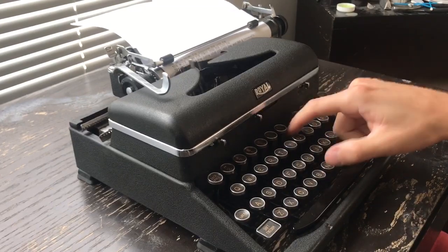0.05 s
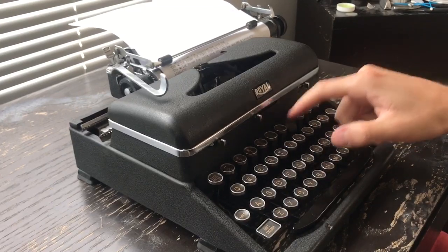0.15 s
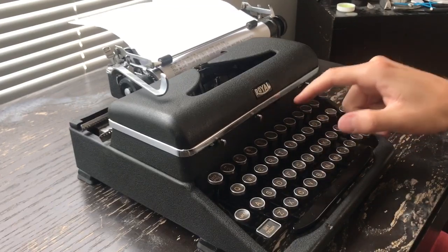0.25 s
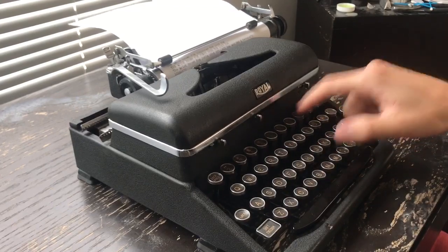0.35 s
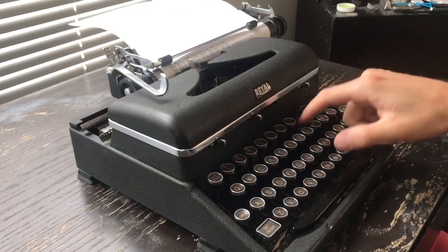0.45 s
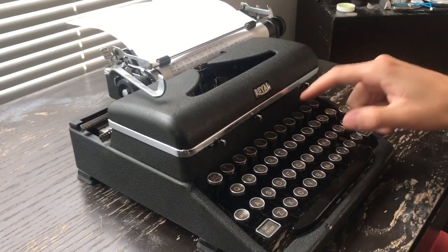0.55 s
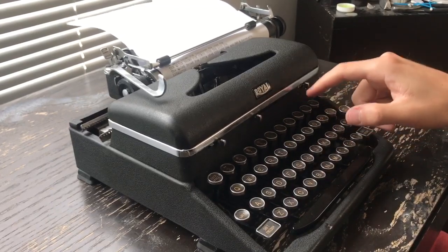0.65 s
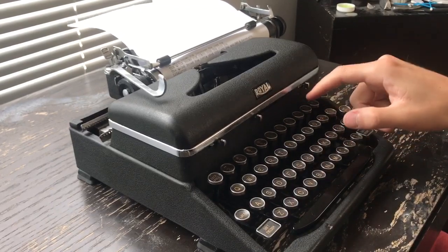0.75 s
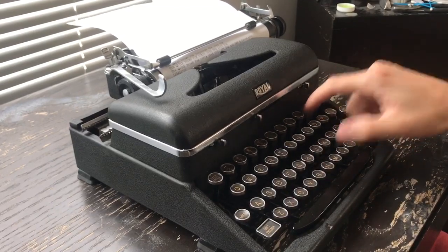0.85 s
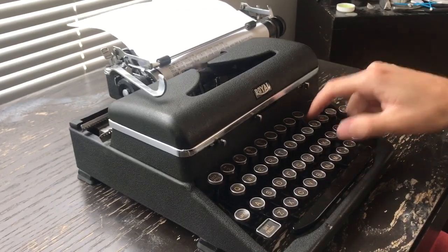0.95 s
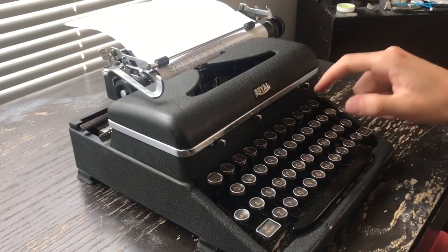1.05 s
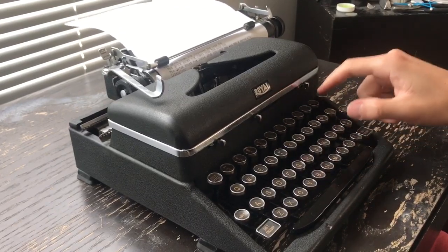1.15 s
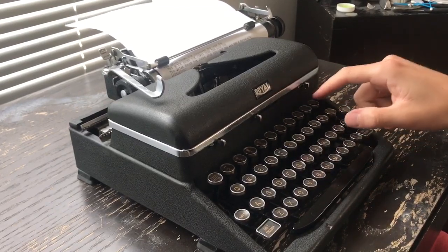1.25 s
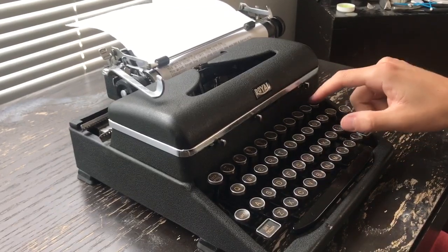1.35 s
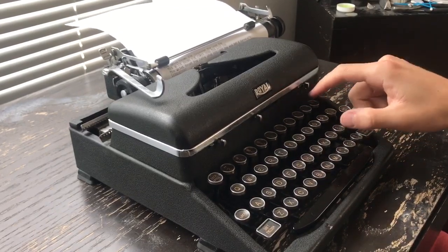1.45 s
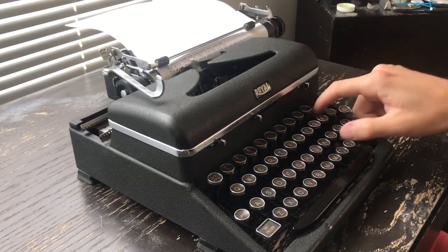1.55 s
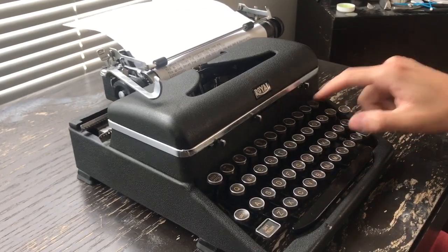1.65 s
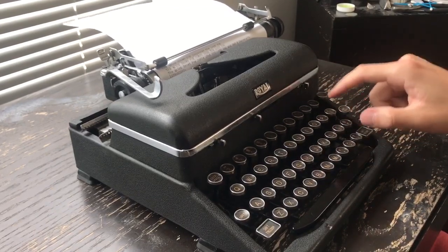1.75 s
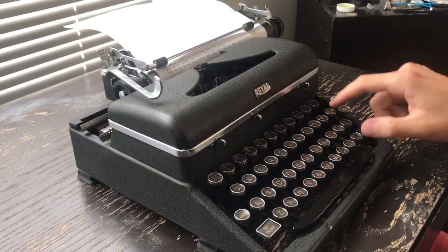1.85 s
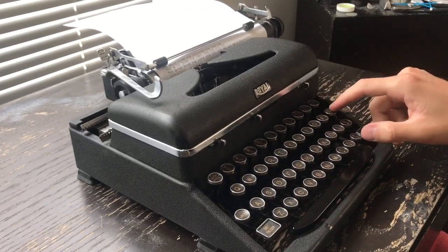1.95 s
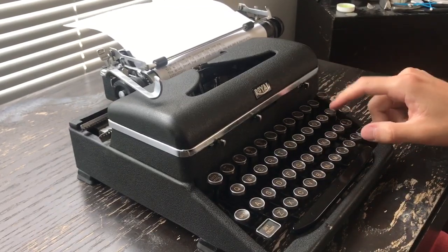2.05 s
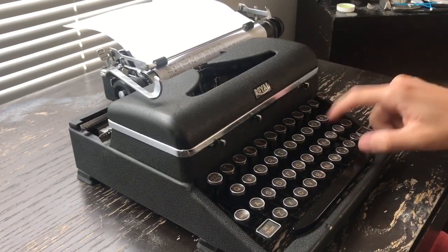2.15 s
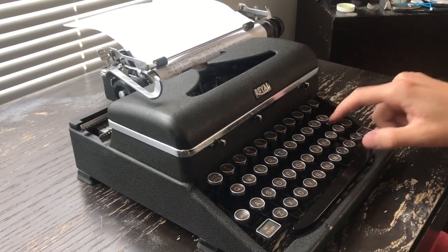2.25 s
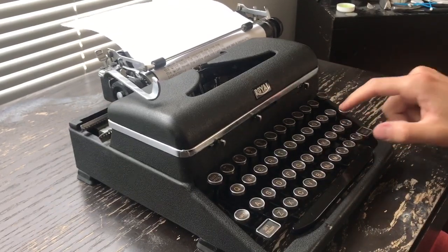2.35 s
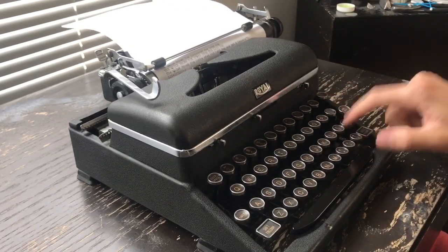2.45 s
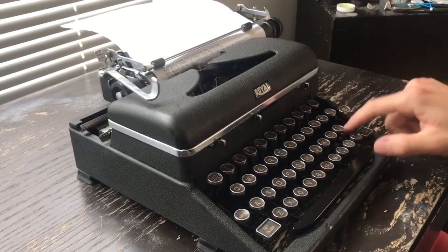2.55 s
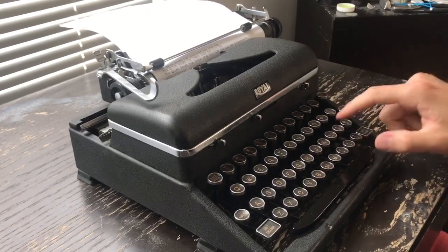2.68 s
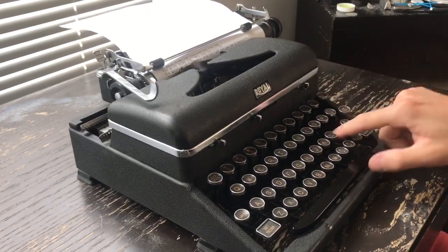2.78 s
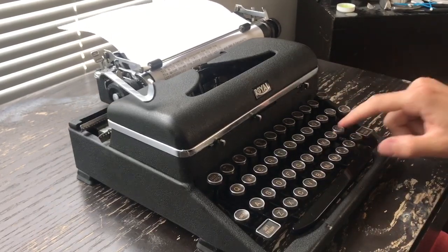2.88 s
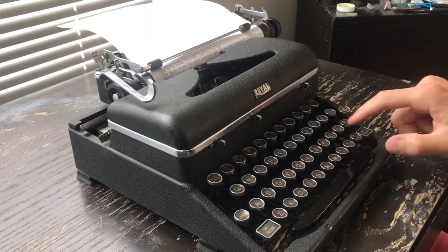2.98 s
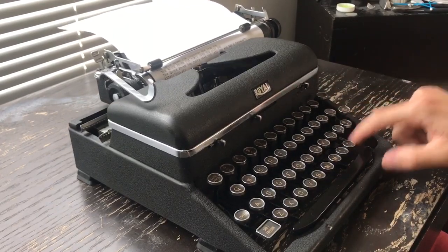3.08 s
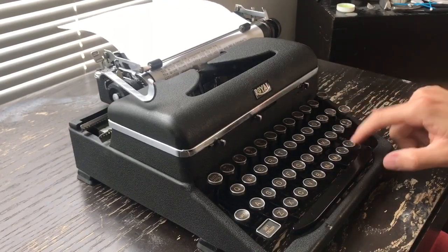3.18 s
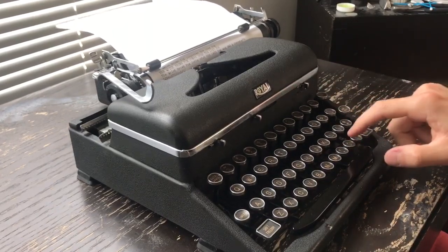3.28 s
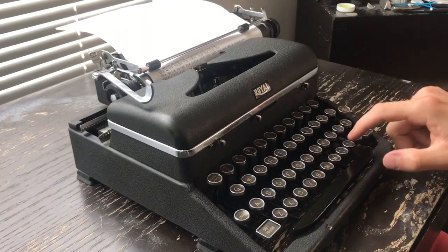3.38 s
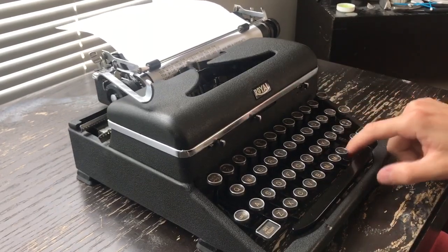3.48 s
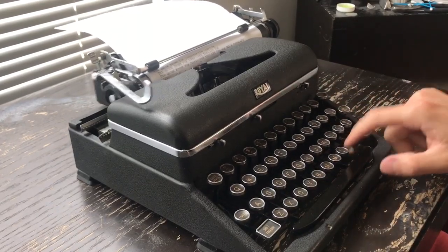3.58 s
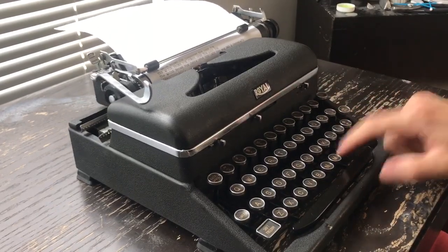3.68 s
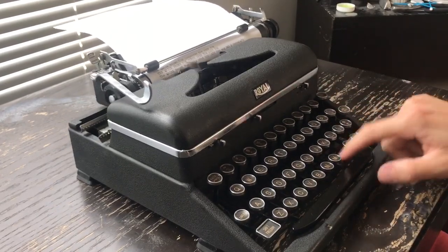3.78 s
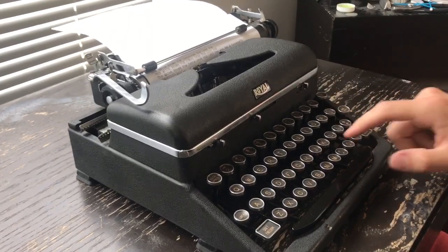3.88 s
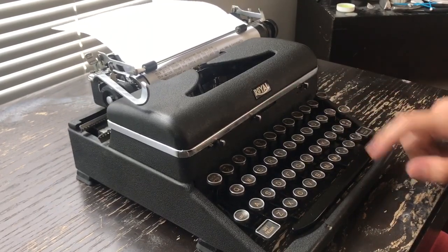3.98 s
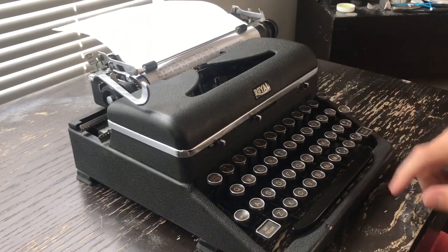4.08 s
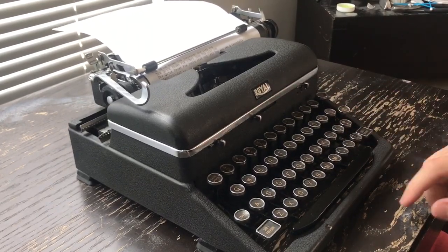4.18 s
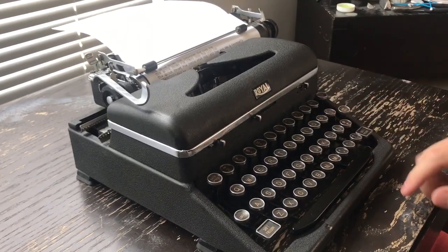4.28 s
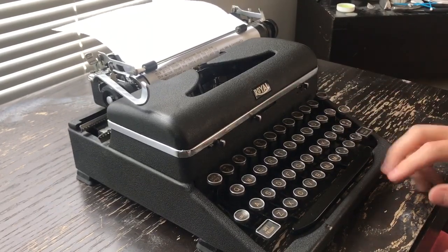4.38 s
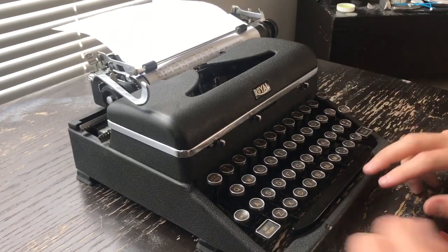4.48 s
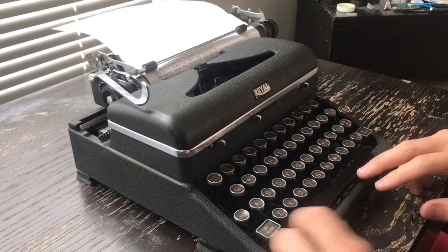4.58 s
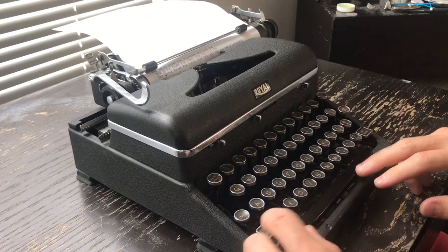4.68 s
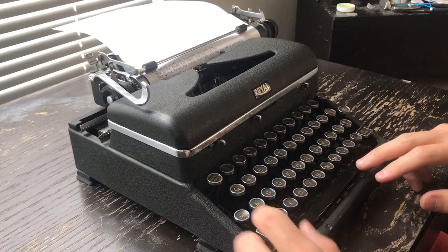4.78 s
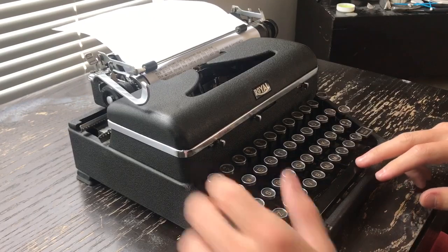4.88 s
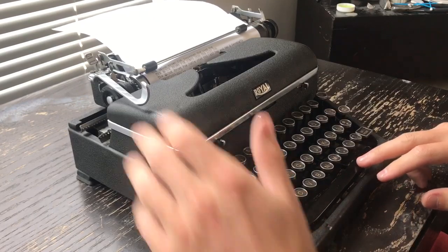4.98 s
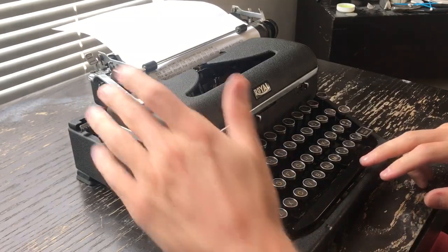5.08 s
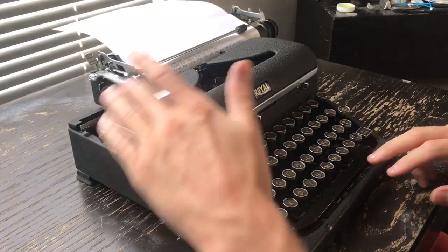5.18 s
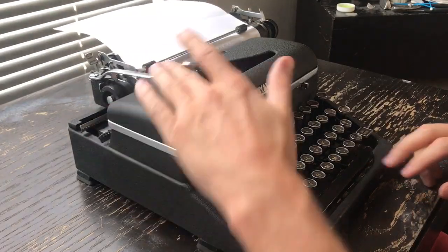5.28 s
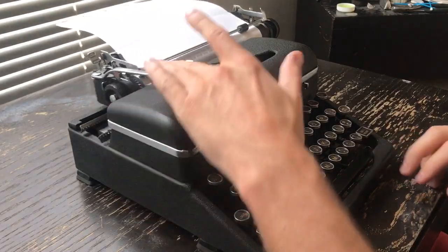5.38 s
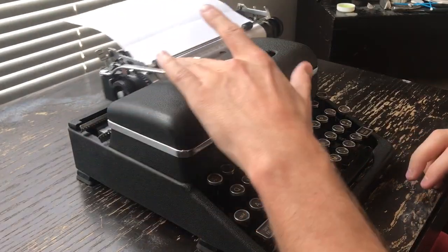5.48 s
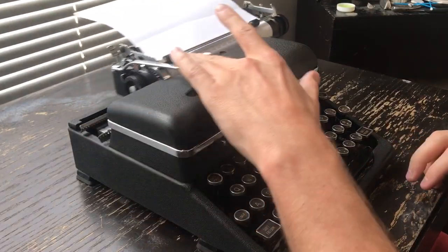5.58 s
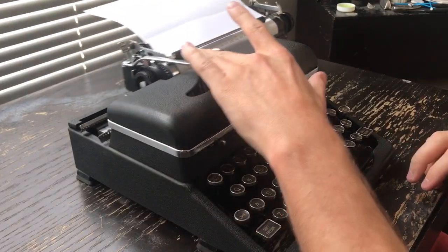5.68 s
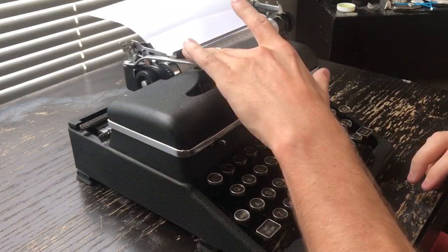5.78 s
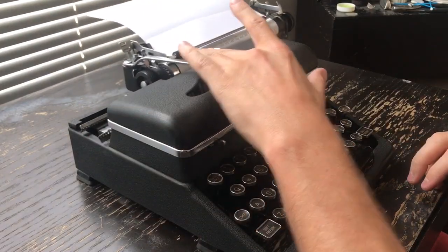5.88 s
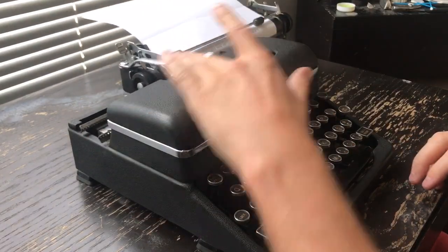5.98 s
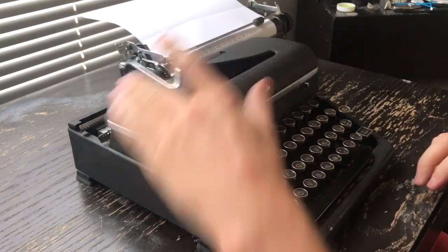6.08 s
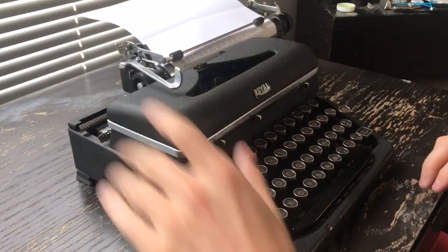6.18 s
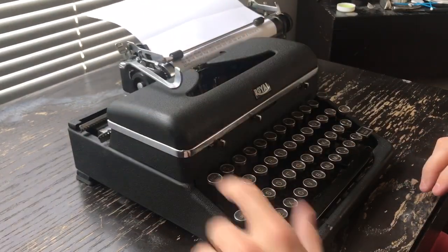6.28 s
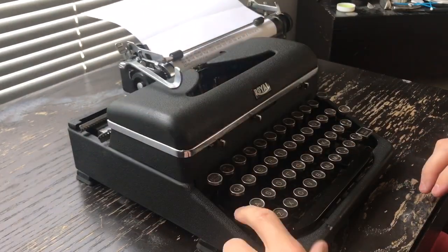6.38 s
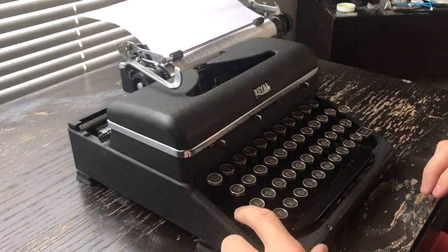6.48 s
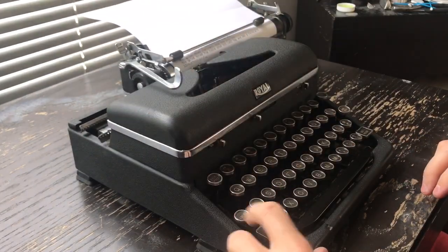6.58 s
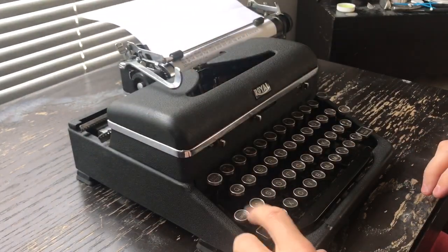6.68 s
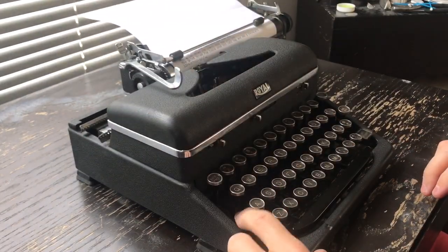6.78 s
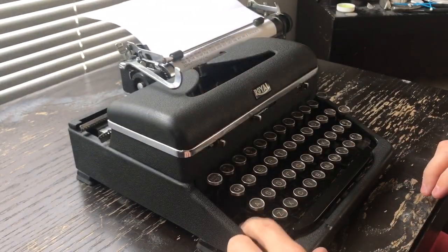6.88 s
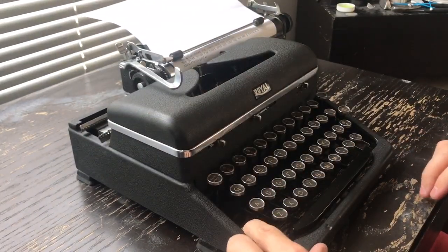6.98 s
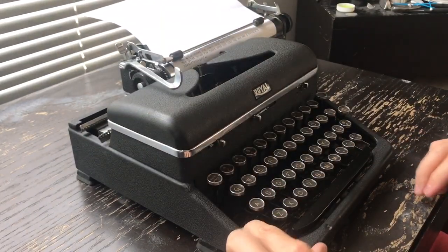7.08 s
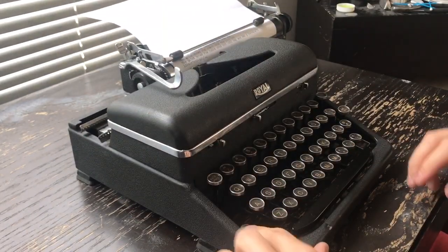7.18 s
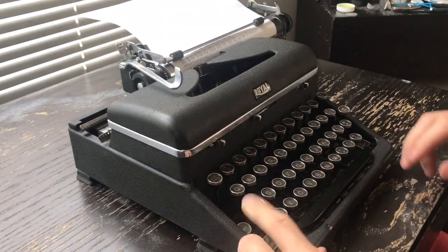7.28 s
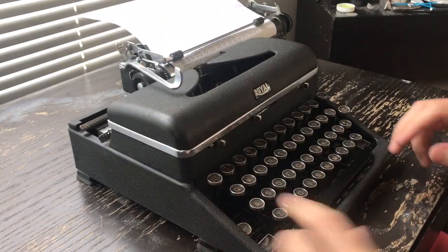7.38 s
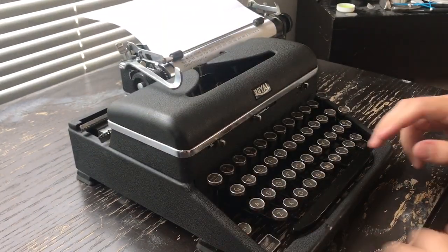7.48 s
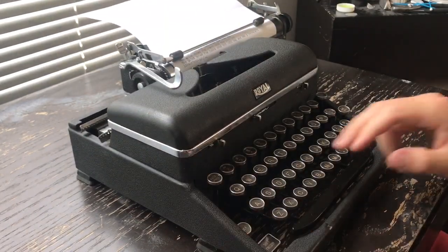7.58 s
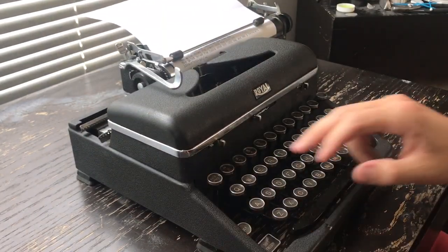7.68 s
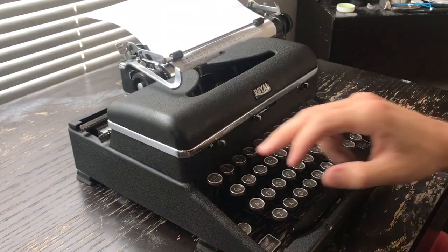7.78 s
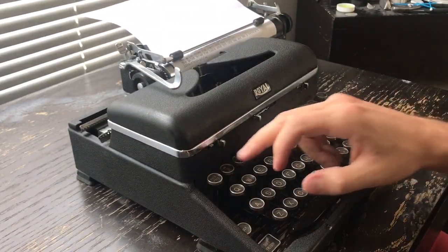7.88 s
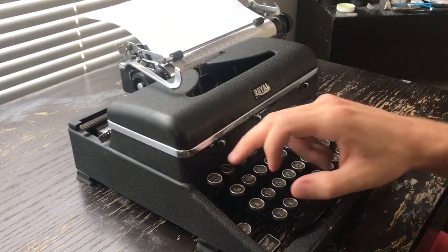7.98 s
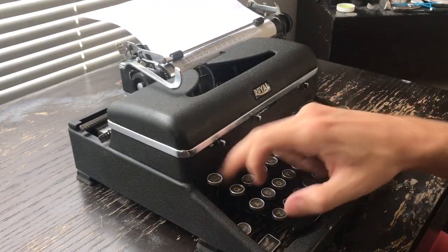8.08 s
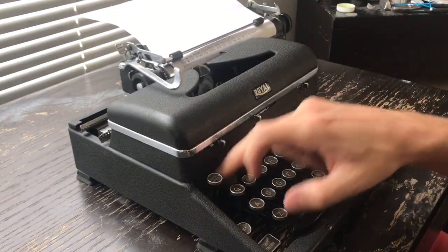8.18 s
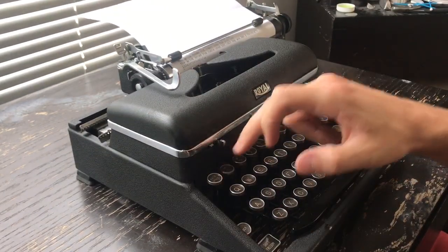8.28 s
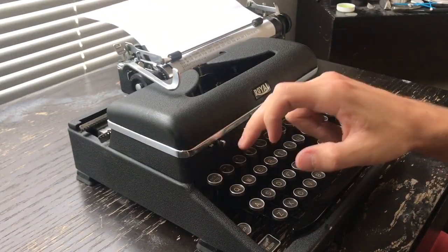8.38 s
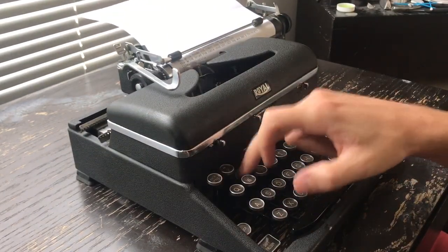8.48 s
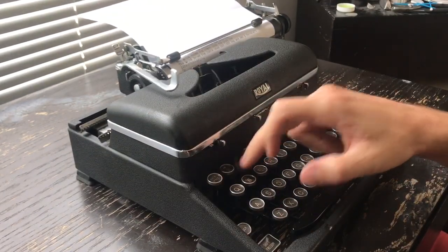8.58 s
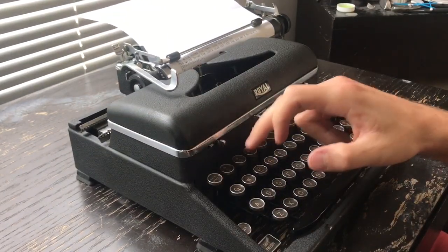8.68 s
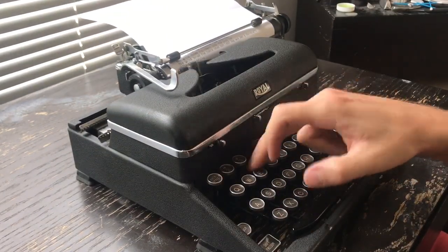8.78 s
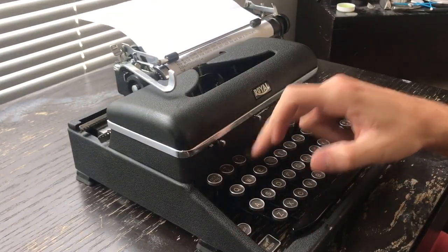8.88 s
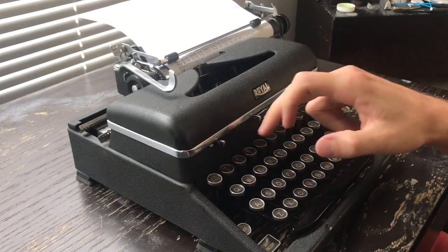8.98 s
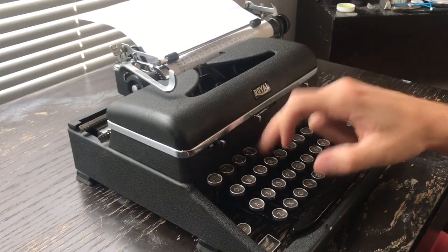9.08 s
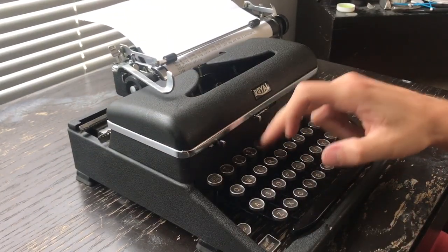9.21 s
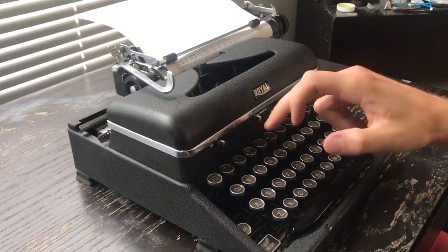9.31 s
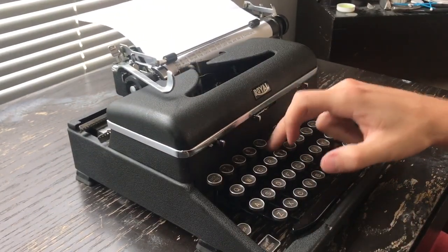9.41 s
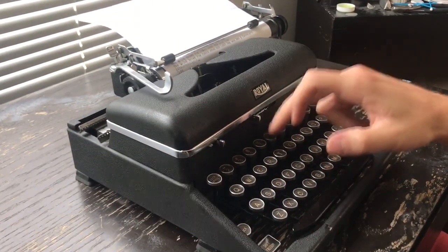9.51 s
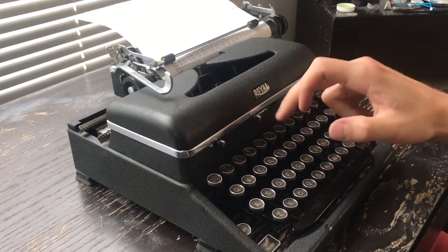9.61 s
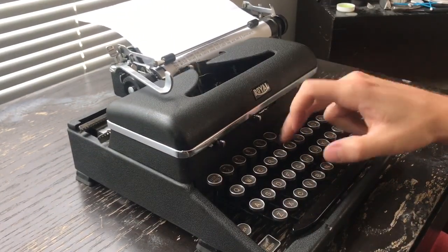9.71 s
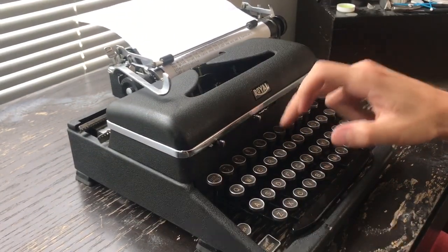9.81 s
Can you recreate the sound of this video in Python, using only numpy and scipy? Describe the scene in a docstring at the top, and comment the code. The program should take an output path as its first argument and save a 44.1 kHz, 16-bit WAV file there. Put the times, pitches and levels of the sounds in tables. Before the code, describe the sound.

Slow, sharp clacks of a manual typewriter, broken by a short rasping carriage return and a few knocks before the typing resumes.

```python
"""A portable manual typewriter, typed with one finger on a wooden desk in a small room.
Each letter is a chain of impacts: the key linkage clicks, the escapement trips, the typebar slaps the
platen, the carriage steps and the bar drops back. The blows excite modes of the steel frame and the desk.
Between two words the carriage is pushed back over its ratchet and the shift is locked.
Reverberation follows each blow, over a low rumble and a faint hiss that comes and goes."""
import sys
import numpy as np
from scipy import signal
from scipy.fft import rfft, irfft, next_fast_len
from scipy.io import wavfile

SR = 44100
rng = np.random.default_rng(int(sys.argv[2]) if len(sys.argv) > 2 else 0)


def persist_wave(psi):
    """Save psi, clipped to +-1, as 16-bit WAV."""
    counts = np.round(np.clip(psi, -1, 1) * 32767).astype(np.int16)
    wavfile.write(sys.argv[1], SR, np.atleast_2d(counts).T)


N = 434385

# Levels in the tables are relative; each source adds its own gain.
# noise spectra of the background and the contacts: frequency_hz, density_db
RUMBLE_SPECTRUM = [(15, -54), (25, -21.5), (39, -6.5), (59, -3.5), (161, -9), (180, -24.5), (200, -10.5),
                   (293, -18.5), (326, -16), (607, -29), (754, -24), (887, -30.5), (1330, -28), (1740, -36),
                   (16000, -50)]  # still room
SLAP_SPECTRUM = [(100, -15.5), (400, -10), (900, -6.5), (1600, -12), (2200, -7), (2800, 1.5), (3400, -5),
                 (4400, -0.5), (5300, -5.5), (7300, -8), (9500, -8.5), (12000, -8.5), (15500, -12.5)]  # typebar and escapement
FELT_SPECTRUM = [(100, 1), (300, -1), (480, -6.5), (720, -1), (1050, 0), (1900, -6.5), (3000, -6),
                 (5000, -16.5), (9000, -19.5), (16000, -29)]  # cushioned blows
LINKAGE_SPECTRUM = [(200, -8), (900, 0.5), (2000, -1), (3000, -2), (5000, -8.5), (8000, -6.5), (12000, -6),
                    (16000, -4.5)]  # key linkage
SPRING_SPECTRUM = [(300, -15), (1500, -5), (3000, -2.5), (6000, -2), (9000, -7), (12500, -1), (16000, -5)]  # small springs
PAWL_SPECTRUM = [(400, -31), (700, -1), (930, -12), (1250, -3), (1440, -17), (1750, -3), (2300, -3.5),
                 (3000, -3), (4000, -2), (5100, -6), (7200, -5), (8400, -3.5), (10200, -5.5), (15500, -5.5)]  # pawl on a tooth
LATCH_SPECTRUM = [(250, -9), (700, -1), (1130, 4), (1800, -3), (2700, 1), (3600, -5), (4400, -2.5),
                  (6500, -10.5), (8200, 0.5), (10500, -18), (14000, -9), (16000, -21)]  # shift latch
CRACK_SPECTRUM = [(1200, -28.5), (2000, -2), (3200, 1), (5500, -22.5)]  # the bar itself
HISS_SPECTRUM = [(1000, 1), (4000, -2.5), (16000, -8.5)]
# reverberation of machine and room: frequency_hz, level_db, t60_s
REVERB_BANDS = [(80, -7.5, 0.98), (250, -10, 0.55), (498, -8.5, 0.54), (1200, -7.5, 0.35), (3020, -9, 0.36),
                (6200, -8, 0.38), (10800, -6, 0.2), (16000, -9, 0.24)]
# normal modes: pitch_hz, level_db, t60_s
DESK_MODES = [(59.3, -13, 1), (86.6, -6, .25), (117.2, -6, 0.35), (156.4, -1.5, 0.19), (207.2, -0.5, 0.41),
              (269.3, -8, .35), (290.5, -6.5, 0.33), (361, -8, 0.13), (545, -7, 0.2)]  # case and desk top
ROCKING_MODES = [(61.2, -5, 0.98), (73, -22, .3), (95.3, -11, 0.74), (114.7, -2, 0.25), (163.4, -3, 0.26),
                 (196, -2.5, 0.23), (263, -20, 0.24)]  # machine on its rubber feet
RACK_MODES = [(921, -7, .04), (1440, -9, .04), (2360, -1, .025), (2960, 1, .025), (3970, 2, .02),
              (5080, -1, .02), (8380, -1, .025)]  # toothed rack and carriage
FRAME_MODES = [(1980, -2, .07), (2330, -5, .05), (2576, 0.5, .09), (2590, 0.5, .08), (2647, -5, .06),
               (2850, -6.5, 0.061), (2935, -0.5, 0.22), (3152, -4.5, 0.046), (3436, -7.5, .09),
               (3660, -6.5, 0.14), (4358, -7.5, .05), (4700, -10.5, .05), (5300, -9, .06)]  # steel frame and typebar basket
LEFT_BAR_MODES = [(4295, 9, 0.021), (4450, 10.5, 0.013), (4960, -12, .028), (5510, 8, 0.022),
                  (9700, -19, 0.028), (11300, 0, 0.033)]  # higher-ringing bars at the left of the basket
# spells of hiss: start_s, end_s, level_db
HISS_SPELLS = [(0, 1.406, -65.5), (2.259, 4.24, -66)]
# hand on the return lever, carriage on its stop, parts settling:
# start_s, level_db, treble_db, rocking_db, t60_s
CARRIAGE_KNOCKS = [(4.392, -62, -15, -1, 0.081), (5.303, -56, 9.5, -1, 0.04), (5.334, -57, 0, 8, 0.16),
                   (5.362, -57.5, 6, 7.5, 0.36), (5.392, -40, 7, -21, 0.052), (5.81, -37, -16, -8.5, 0.075),
                   (6.041, -35.5, -10, -1, 0.094), (6.16, -45, -3, -9.5, 0.059),
                   (7.084, -53, -2.5, 1.5, 0.062), (7.341, -42, -11, -17, 0.069)]
# carriage being pushed back: time_s, speed_teeth_per_s
CARRIAGE_SPEED = [(5.491, 34.7), (5.55, 42.9), (5.61, 62.8), (5.67, 71.3), (5.81, 48.7)]
# return lever and other small springs snapping home: start_s, level_db
SPRING_TICKS = [(5.325, -49), (6.0129, -45.5), (6.032, -42), (6.0994, -35), (7.3386, -39.5)]
# shift lifting, then latching: start_s, level_db, thump_db
SHIFT_CLACKS = [(6.8975, -36.5, -6.5), (6.997, -27, -5)]
# one row a letter; the swing precedes the hit, fall (bar at rest) and hold (key up) count from it:
# hit_s, level_db, ring_db, treble_db, click_db, swing_s, fall_s, hold_s
KEYSTROKES = [(0.1379, -24.5, -0.5, 0, -37.5, 0.037, 0.11, 0.12),
              (0.4974, -24, -3, 0.5, -36.5, 0.037, 0.11, 0.13),
              (0.9848, -21.5, -5, -5.5, -37.5, 0.033, 0.11, .122),
              (1.6281, -28, 2.5, 2.5, -37, .040, 0.079, 0.12),
              (2.2664, -23.5, -0.5, 2, -40, 0.036, 0.12, 0.17),
              (2.5959, -24.5, 0.5, -3, -38.5, 0.037, 0.075, 0.12),
              (2.861, -28, 5, 2, -36.5, 0.036, 0.06, .127), (3.2044, -23, -0.5, 1.5, -41, .033, 0.11, .150),
              (3.581, -27.5, 3, 2, -43.5, 0.033, 0.11, 0.14),
              (3.8173, -24, 1.5, 6, -38.5, .027, 0.11, 0.14),
              (8.2072, -37.5, -19.5, 9.5, -38, .0495, .097, .127),
              (8.59, -31, -19, 7, -35, .0408, 0.096, 0.11),
              (8.8814, -26.5, -8, 6.5, -40.5, 0.037, 0.099, 0.12),
              (9.2094, -23.5, -18, 2.5, -33.5, .0362, .099, .117),
              (9.5072, -28, -1, -1, -34, .0405, .094, .1078),
              (9.803, -25.5, -7, 2.5, -39.5, 0.041, .1, 0.15)]

AGE = np.arange(10240) / SR  # time since a blow, s


def undb(db):
    """Amplitude ratio of a level in decibels."""
    return np.exp(np.asarray(db) * (np.log(10) / 20))


def envelope(age, rise_s, t60_s):
    """Damped response: a quick build-up times an exponential decay of 60 dB in t60_s."""
    return (1 - np.exp(-age / rise_s)) * np.exp(-np.log(1000) * age / t60_s)


def add(track, start_s, db, sound):
    """Superposition: a sound adds to the track at a given time and gain."""
    i = int(np.clip(start_s * SR, 0, N))
    track[i:i + len(sound)] += undb(db) * sound[:N - i]


def noise(spectrum, size, treble_db=0, hinge_hz=6000):
    """Spectral shaping: white noise is coloured at unit rms, then its treble is shelved."""
    count = next_fast_len(size, real=True)
    hz = np.maximum(np.fft.rfftfreq(count, 1 / SR), 1)
    points_hz, db = np.transpose(spectrum)
    gain = undb(np.interp(np.log(hz), np.log(points_hz), db))
    gain /= np.sqrt(np.mean(gain ** 2))
    shelf = undb(treble_db / (1 + (hinge_hz / hz) ** 4))
    return irfft(rfft(rng.standard_normal(count)) * shelf * gain, count)[:size]


def contact(spectrum, t60_s, rise_s=.00048, treble_db=0, chatter_db=0, size=4096):
    """Modal overlap: the short resonances of many small parts merge into a burst of noise."""
    age = AGE[:size]
    # loose parts chatter about every 2 ms
    chatter = np.interp(age, np.linspace(0, age[-1], 48), rng.standard_normal(48))
    shape = envelope(age, rise_s, t60_s)
    resonances = noise(spectrum, size, treble_db)
    sound = resonances * shape * undb(chatter_db * chatter)
    # the blow sets the energy, however it is shared out
    return sound * np.std(resonances) * np.sqrt(np.sum(shape ** 2) / np.sum(sound ** 2))


def ring(modes, rise_s, scatter_db, detune):
    """Free vibration is a sum of damped modes; each blow lands elsewhere and weights them anew."""
    hz, db, t60_s = np.transpose(modes)[:, :, None]
    age = AGE[:int(t60_s.max() * SR)]
    pitch_draw, level_draw, start_cycles = rng.standard_normal((3, len(modes), 1))
    gain = undb(db + scatter_db * level_draw)
    phase = 2 * np.pi * (hz * (1 + detune * pitch_draw) * age + start_cycles)
    partials = gain * np.sin(phase) * envelope(age, rise_s, t60_s)
    fade_out = np.minimum(10 * (1 - age / age[-1]), 1)
    return partials.sum(0) * fade_out / np.sqrt(np.sum(gain ** 2) / 2)


def background(rumble_db=-58, ramp_s=.022):
    """Broadband noise floor: the steady rumble of the room and a faint hiss that comes and goes."""
    t = np.arange(N) / SR
    rumble = undb(rumble_db) * noise(RUMBLE_SPECTRUM, N)
    hiss_gain = sum(undb(db) * np.clip(np.minimum(t - start, end - t) / ramp_s, 0, 1)
                    for start, end, db in HISS_SPELLS)
    return rumble + hiss_gain * noise(HISS_SPECTRUM, N)


def reverberation(sound, rise_s=.0044):
    """Diffuse decay: springs, bars and near walls ring on, and the treble is damped first."""
    age = np.arange(SR) / SR
    hz, db, t60_s = np.transpose(REVERB_BANDS)
    white = rfft(rng.standard_normal(SR))
    band_position = np.interp(np.log(np.arange(len(white)) + 1), np.log(hz), np.arange(len(hz)))
    response = 0
    for k in range(len(hz)):
        shape = envelope(age, rise_s, t60_s[k])
        band = irfft(white * np.maximum(1 - abs(band_position - k), 0), SR)
        response += undb(db[k]) * band * shape / np.sqrt(np.sum(shape ** 2))
    return signal.fftconvolve(sound, response)[:N]


def desk_thump(rise_s):
    """Structure-borne sound: the case and desk top radiate a blow as a soundboard does."""
    return ring(DESK_MODES, rise_s, scatter_db=2.5, detune=.014)


def rocking(rise_s):
    """Mass on a spring: a shove sets the machine oscillating on its rubber feet."""
    return ring(ROCKING_MODES, rise_s, scatter_db=8, detune=.028)


def carriage_knocks():
    """Momentum transfer: dull blows of the carriage and its lever rock the machine."""
    out = np.zeros(N)
    for start, db, treble_db, rocking_db, t60_s in CARRIAGE_KNOCKS:
        add(out, start, db + 4, contact(FELT_SPECTRUM, t60_s, rise_s=.0017, treble_db=treble_db))
        add(out, start, db + rocking_db, rocking(rise_s=.0046))
    return out


def shift_lock():
    """Impact and reaction: the shift clacks, jolts the machine and shakes the desk."""
    out = np.zeros(N)
    for start, db, thump_db in SHIFT_CLACKS:
        add(out, start - .003, db - 18, contact(LATCH_SPECTRUM, t60_s=.036, rise_s=.0023))
        add(out, start, db - 3.5, contact(LATCH_SPECTRUM, t60_s=.046, rise_s=.0004))
        add(out, start, db + thump_db - 1, rocking(rise_s=.003))
        add(out, start, db + thump_db - 8, desk_thump(rise_s=.0048))
    return out


def ratchet(click_db=-37, usual_teeth_per_s=68, db_per_doubling=3, rack_db=-43):
    """Impact train: the pawl clicks once a tooth, louder with speed, and rings the rack."""
    out = np.zeros(N)
    times, speeds = np.transpose(CARRIAGE_SPEED)
    t = np.arange(times[0], times[-1], 1 / SR)
    speed = np.interp(t, times, speeds)
    travel_teeth = np.cumsum(speed) / SR
    for i in np.searchsorted(travel_teeth, np.arange(travel_teeth[-1])):
        db = click_db + db_per_doubling * np.log2(speed[i] / usual_teeth_per_s)
        add(out, t[i], db, contact(PAWL_SPECTRUM, t60_s=.031, rise_s=.00064))
        drag = contact(PAWL_SPECTRUM, t60_s=.11, rise_s=.006, treble_db=-25, chatter_db=1)
        add(out, t[i], db - 6.5, drag)
        add(out, t[i], rack_db, ring(RACK_MODES, rise_s=.0004, scatter_db=2, detune=.025))
    return out


def springs(key_db=-35.5, usual_hold_s=.12, sag_db_per_s=70, bounce_s=.0092, bounce_db=-4):
    """Elastic release: springs snap home; a key's spring bounces once and is softer after a long hold."""
    out = np.zeros(N)
    snaps = [(start, db + 4) for start, db in SPRING_TICKS]
    for hit, *_, hold in KEYSTROKES:
        db = key_db - sag_db_per_s * (hold - usual_hold_s)
        snaps += [(hit + hold, db), (hit + hold + bounce_s, db + bounce_db)]
    for start, db in snaps:
        add(out, start, db, contact(SPRING_SPECTRUM, t60_s=.016, rise_s=.0005))
    return out


def key_linkages():
    """Impact, then friction: the steel linkage clicks and slides on while the bar swings up."""
    out = np.zeros(N)
    for hit, _, _, _, click_db, swing, _, _ in KEYSTROKES:
        press = hit - swing
        add(out, press, click_db + 3, contact(LINKAGE_SPECTRUM, t60_s=.03, rise_s=.0014))
        slide = contact(LINKAGE_SPECTRUM, t60_s=.36, rise_s=.006, treble_db=-10, chatter_db=1.5)
        add(out, press + .004, -47, slide)
        add(out, press, -45.5, desk_thump(rise_s=.007))
    return out


def typebar_returns():
    """Cushioned impact: the bar slides home onto its felt, then the key lever meets the case."""
    out = np.zeros(N)
    for hit, *_, fall, hold in KEYSTROKES:
        landing, key_up = hit + fall, hit + hold
        slide = contact(FELT_SPECTRUM, t60_s=.064, rise_s=.0027, treble_db=6, chatter_db=3.5)
        add(out, landing - .018, -42.5, slide)
        add(out, landing - .001, -30.5, contact(FELT_SPECTRUM, t60_s=.081, rise_s=.0028, chatter_db=2.5))
        add(out, landing, -43.5, desk_thump(rise_s=.008))
        lever = contact(FELT_SPECTRUM, t60_s=.092, rise_s=.00095, treble_db=-2, chatter_db=3.5)
        add(out, key_up, -41, lever)
        add(out, key_up, -38.5, desk_thump(rise_s=.0051))
    return out


def escapement(swing_left=.3, trip_db=-31.5, step_s=.0128, settle_s=.026):
    """Release and arrest: the escapement trips in mid-swing; the carriage jumps a tooth and rattles."""
    out = np.zeros(N)
    for hit, db, ring_db, _, _, swing, _, _ in KEYSTROKES:
        trip = contact(SLAP_SPECTRUM, t60_s=.081, rise_s=.00027, treble_db=-14.5, chatter_db=2)
        add(out, hit - swing_left * swing, trip_db, trip)
        add(out, hit + step_s, db - 8, contact(SLAP_SPECTRUM, t60_s=.023))
        settles = hit + settle_s + .0036 * rng.uniform(-1, 1)
        rattle = contact(SLAP_SPECTRUM, t60_s=.038, rise_s=.001, chatter_db=2.5)
        add(out, settles, db - 8.5 + .5 * ring_db, rattle)
    return out


def typebar_strikes(platen_db=-28, left_keys_from_s=8):
    """Impulsive excitation: the slug's brief blow on the platen rings the bar, frame and desk."""
    out = np.zeros(N)
    for hit, db, ring_db, treble_db, *_ in KEYSTROKES:
        # the slug scrapes through the type guide and pushes the ribbon to the paper
        add(out, hit - .005, db - 11, contact(SLAP_SPECTRUM, t60_s=.036, rise_s=.002, treble_db=10))
        add(out, hit - .003, -33, contact(FELT_SPECTRUM, t60_s=.05, rise_s=.0027))
        slap = contact(SLAP_SPECTRUM, t60_s=.024, rise_s=.00009, treble_db=treble_db)
        add(out, hit, db + 7.5, slap)
        add(out, hit, db + ring_db - 8, ring(FRAME_MODES, rise_s=.00057, scatter_db=.5, detune=.014))
        add(out, hit, db + ring_db + 10.5, contact(CRACK_SPECTRUM, t60_s=.012))
        if hit > left_keys_from_s:  # the second word
            add(out, hit, db + 5, ring(LEFT_BAR_MODES, rise_s=.00022, scatter_db=1, detune=.031))
        # rubber yields, so the platen's knock is slower and duller
        knock = contact(FELT_SPECTRUM, t60_s=.095, rise_s=.0047, treble_db=-7.5, chatter_db=3.5)
        add(out, hit, platen_db, knock)
        add(out, hit - .004, -33.5 + .3 * (db + 22), desk_thump(rise_s=.003))
    return out


def typewriter():
    """Radiation in one direction: the typing action and the carriage add linearly."""
    typing = typebar_strikes() + escapement() + typebar_returns() + key_linkages() + springs()
    return typing + ratchet() + carriage_knocks()


def scene(front_db=-5, back_db=-2, shift_send_db=-6):
    """Direct and reverberant fields: one side of the machine is heard directly, both by reflection."""
    front, back = typewriter(), typewriter()
    latch = shift_lock()
    reflections = undb(front_db) * reverberation(front)
    reflections += undb(back_db) * reverberation(back + undb(shift_send_db) * latch)
    return (front + latch + reflections + background())[None]


def record(dry, low_hz=36, top_hz=15900):
    """Band limiting: filters remove the deepest bass and the highest treble."""
    high_pass = signal.butter(3, low_hz, "high", fs=SR, output="sos")
    low_pass = signal.ellip(10, .2, 70, top_hz, fs=SR, output="sos")
    return signal.sosfilt(low_pass, signal.sosfilt(high_pass, dry))


dry = scene()
out = record(dry)
persist_wave(out)
```